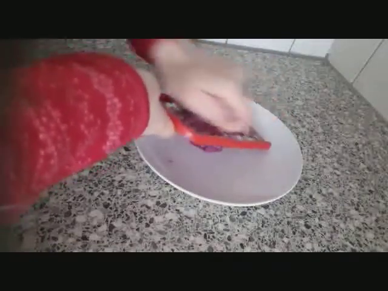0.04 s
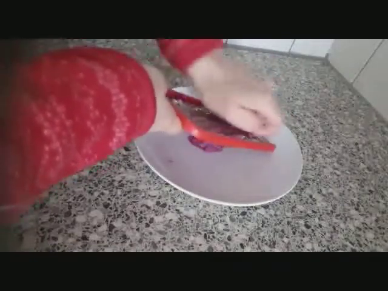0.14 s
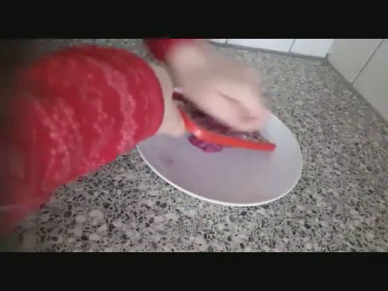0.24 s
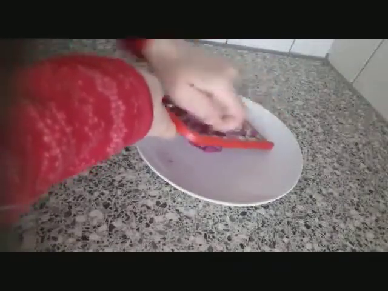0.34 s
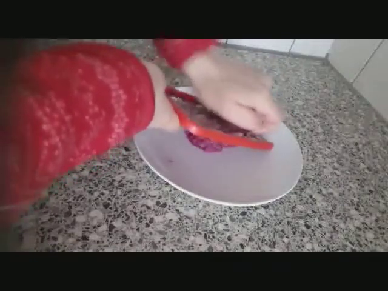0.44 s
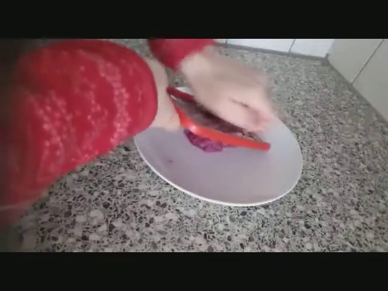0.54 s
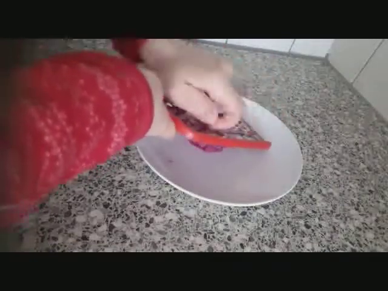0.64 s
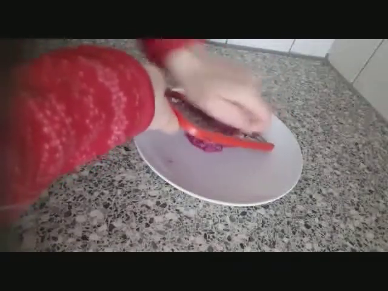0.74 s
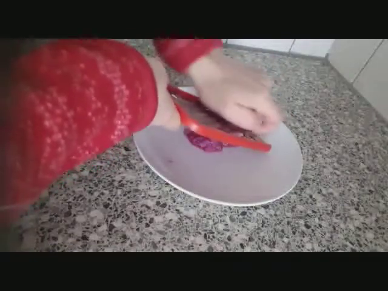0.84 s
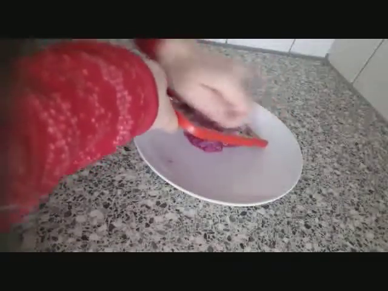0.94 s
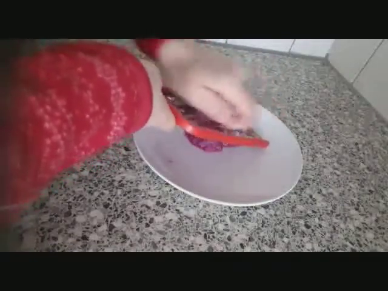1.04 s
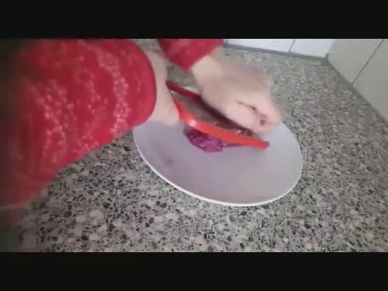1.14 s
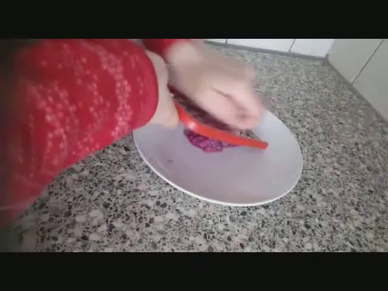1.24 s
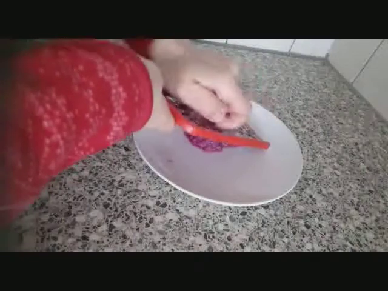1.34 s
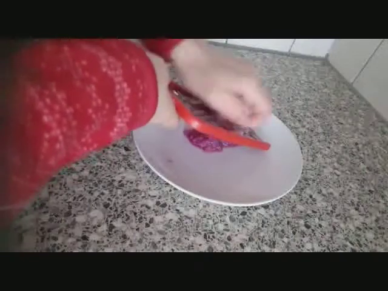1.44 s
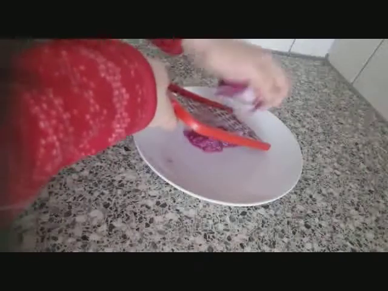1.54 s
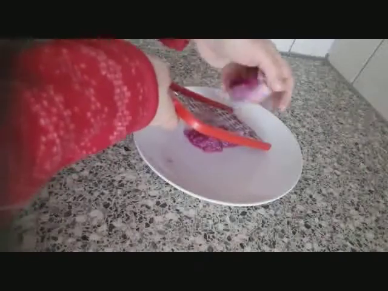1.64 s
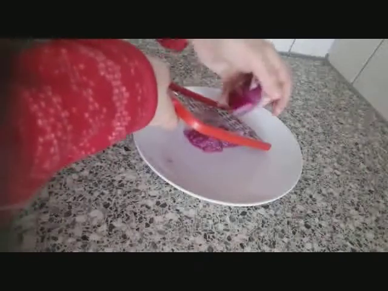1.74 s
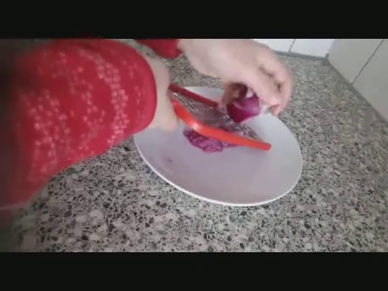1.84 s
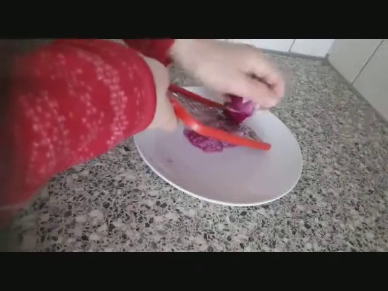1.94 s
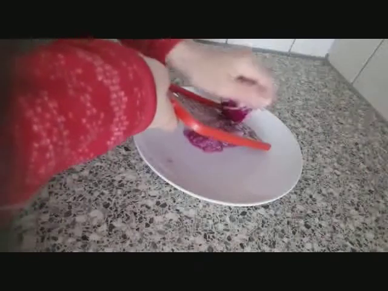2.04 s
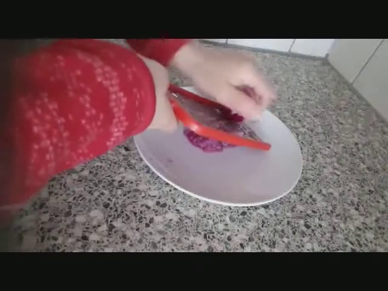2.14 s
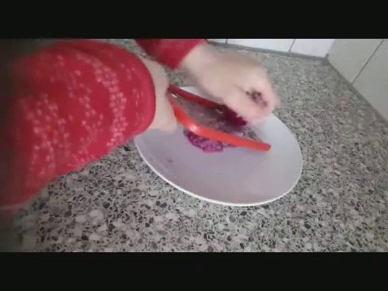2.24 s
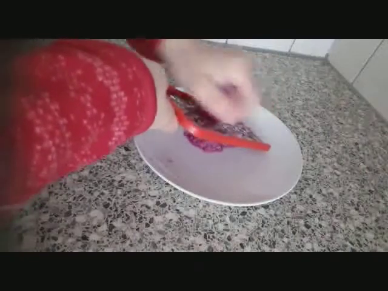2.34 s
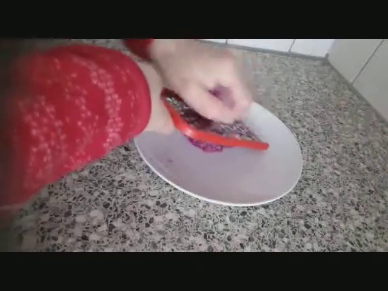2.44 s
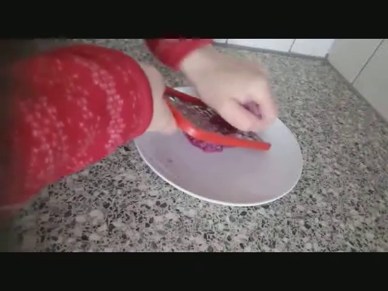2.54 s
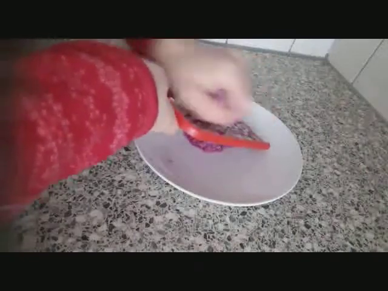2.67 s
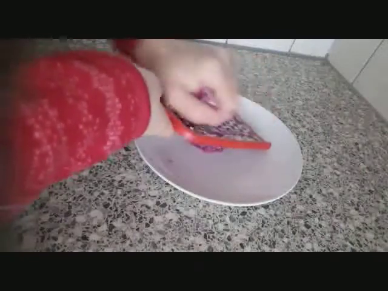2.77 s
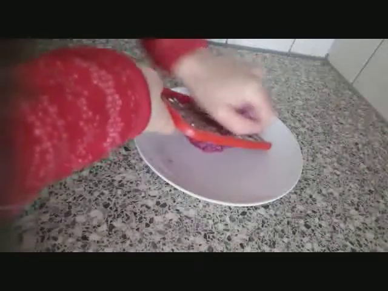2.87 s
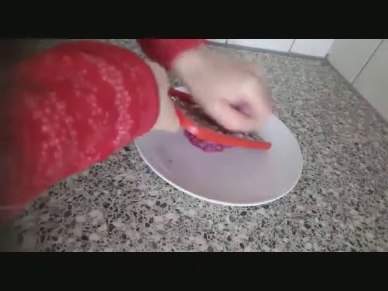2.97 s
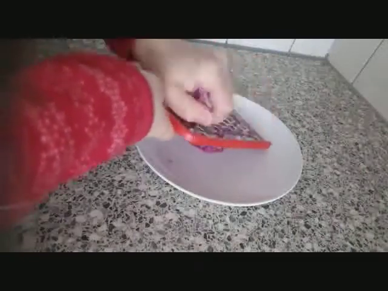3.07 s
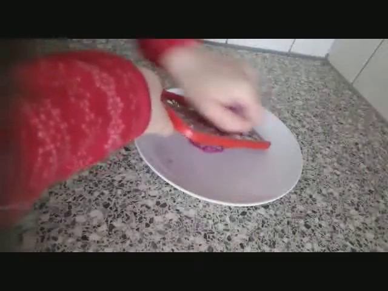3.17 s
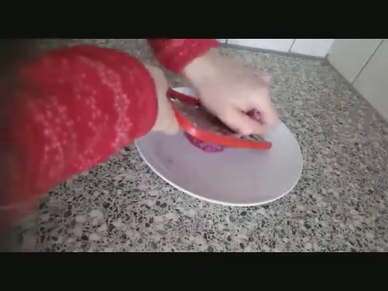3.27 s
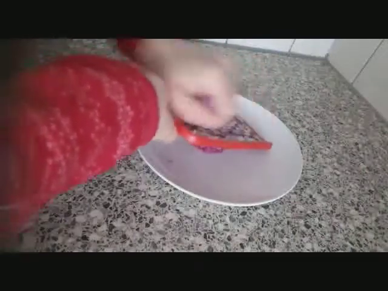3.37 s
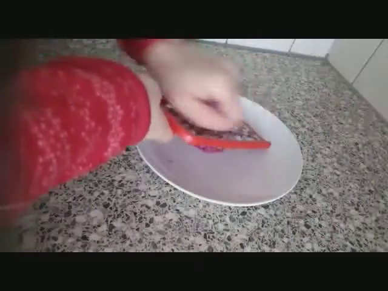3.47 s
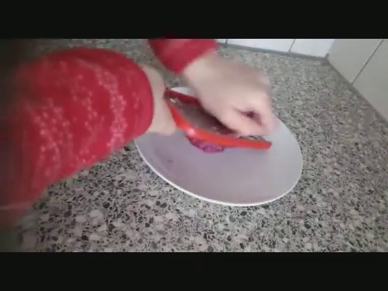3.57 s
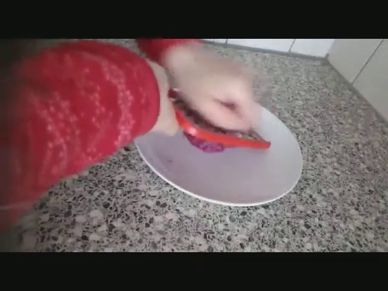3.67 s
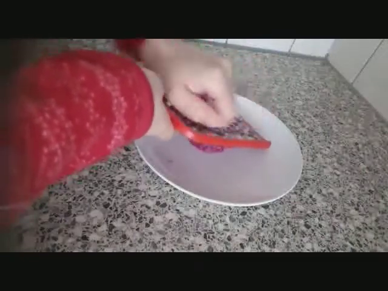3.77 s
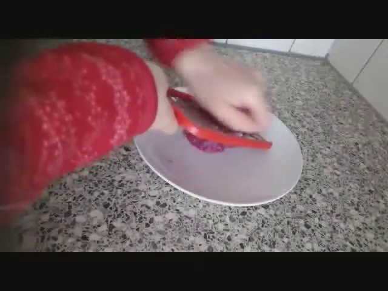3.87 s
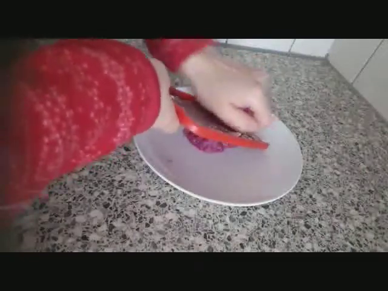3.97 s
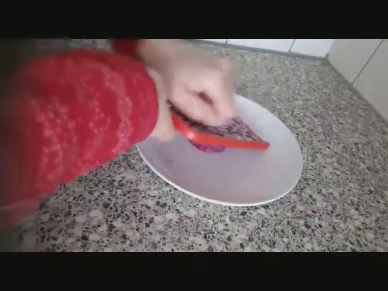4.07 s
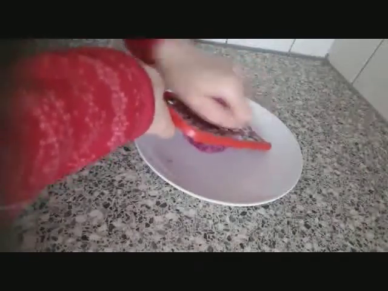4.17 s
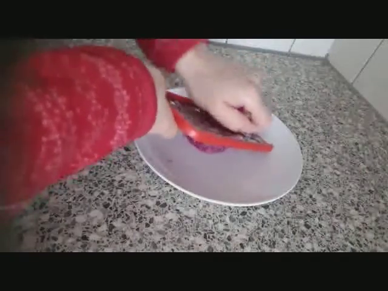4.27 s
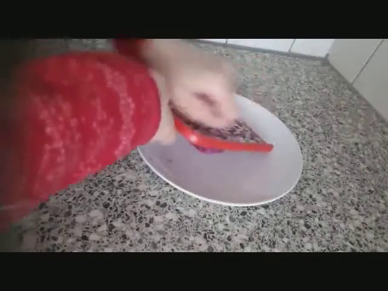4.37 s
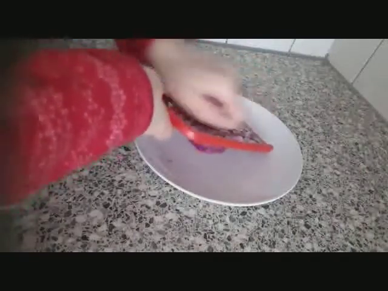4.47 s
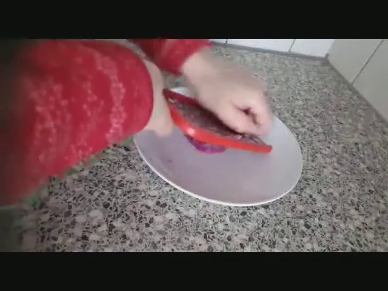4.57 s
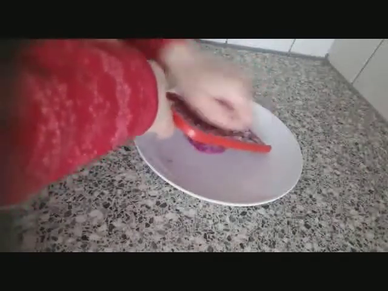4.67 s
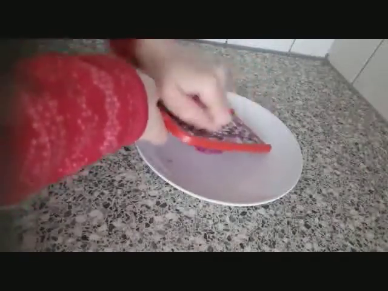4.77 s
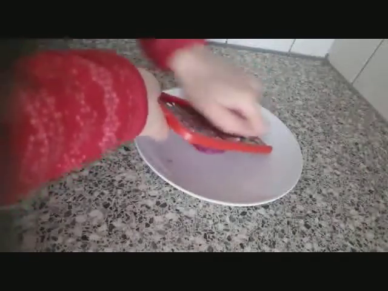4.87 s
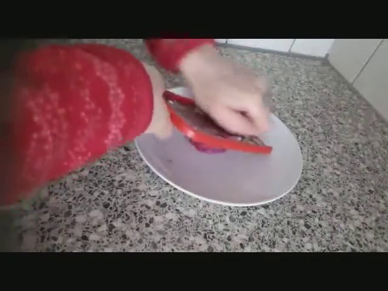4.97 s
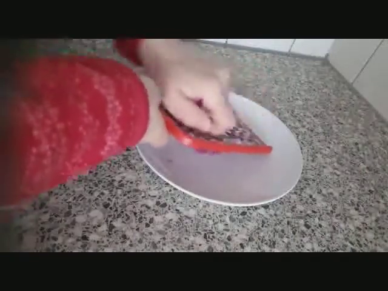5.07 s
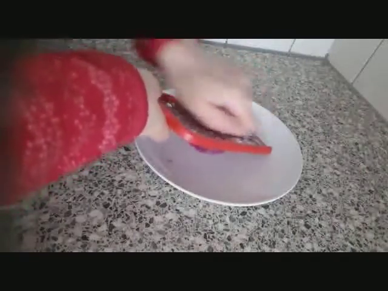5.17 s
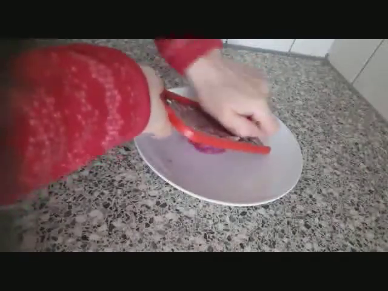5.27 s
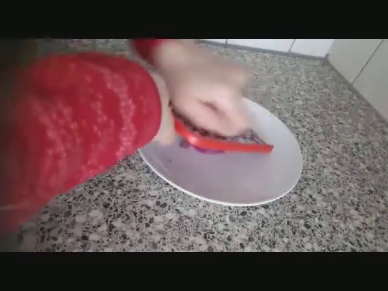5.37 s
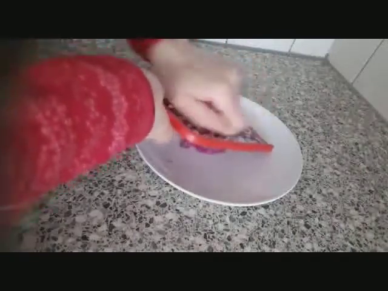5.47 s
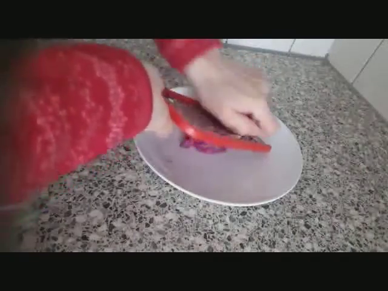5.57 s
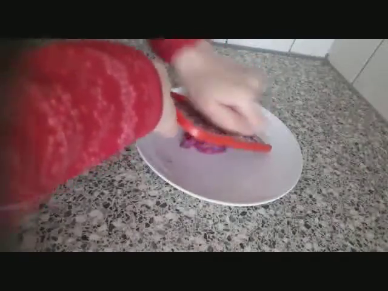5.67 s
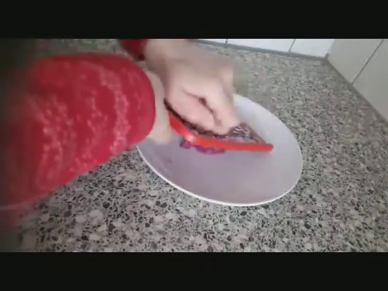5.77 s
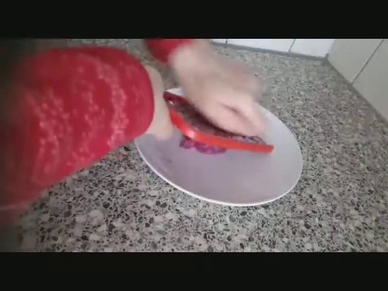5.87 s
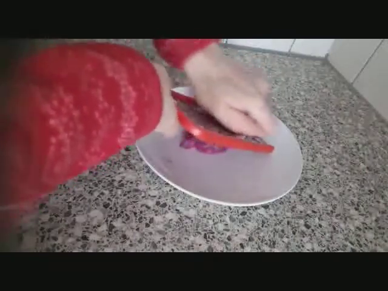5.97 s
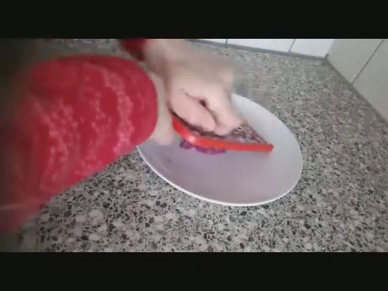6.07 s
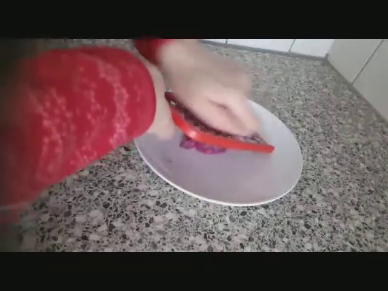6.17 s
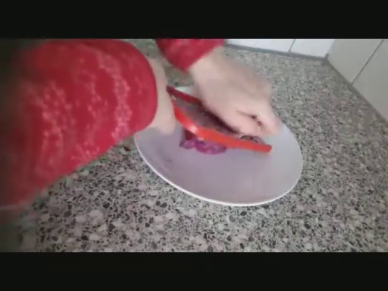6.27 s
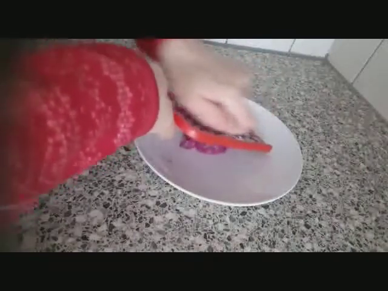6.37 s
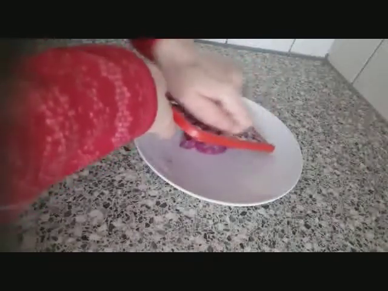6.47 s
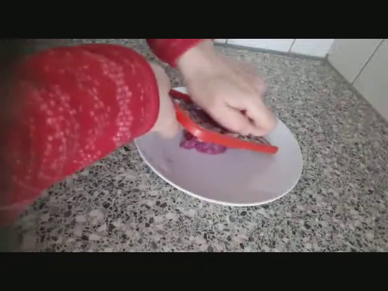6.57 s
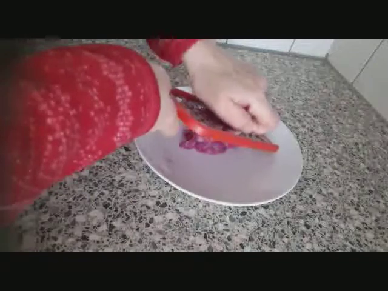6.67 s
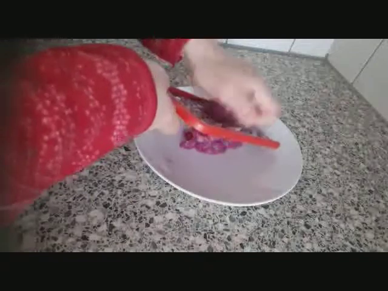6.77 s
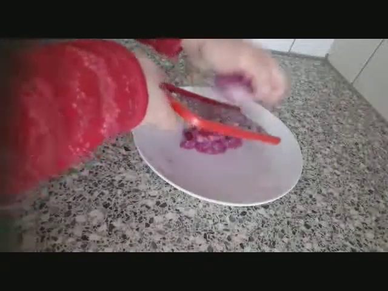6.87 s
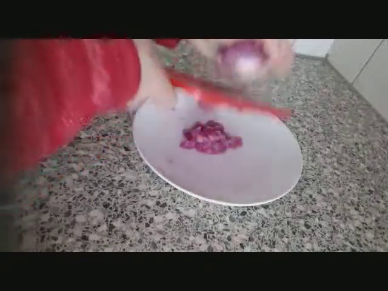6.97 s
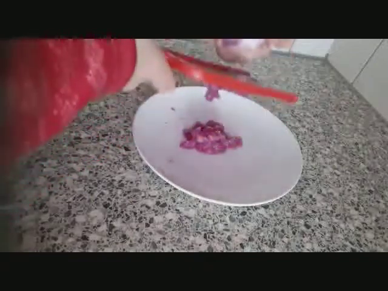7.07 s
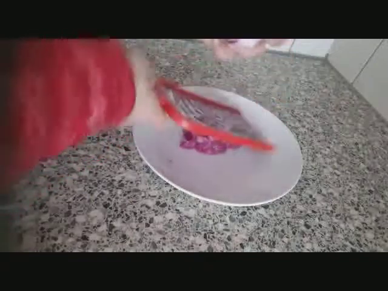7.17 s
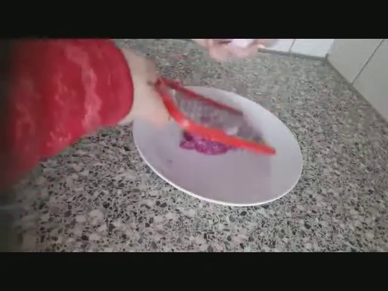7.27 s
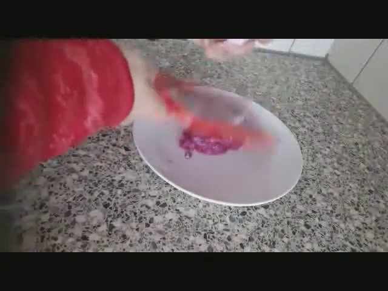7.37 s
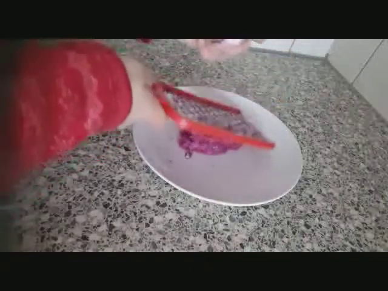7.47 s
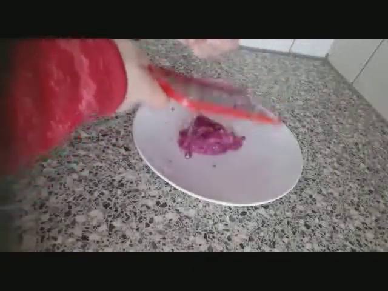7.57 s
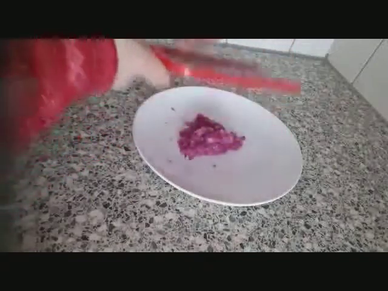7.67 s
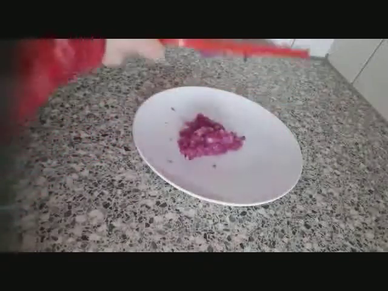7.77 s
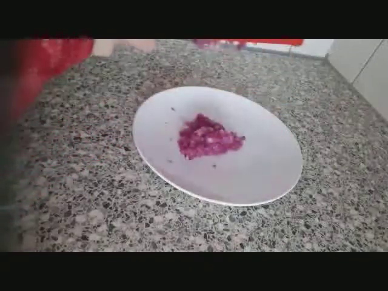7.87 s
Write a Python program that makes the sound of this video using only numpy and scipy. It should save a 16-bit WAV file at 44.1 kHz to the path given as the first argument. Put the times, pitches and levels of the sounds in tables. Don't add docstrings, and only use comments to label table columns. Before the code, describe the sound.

Fast to-and-fro wet rasping of an onion on a metal grater, a brief pause, more strokes, then two sharp knocks on a ceramic plate.

```python
import sys
import numpy as np
from scipy import signal
from scipy.fft import rfft, irfft, next_fast_len
from scipy.io import wavfile
from scipy.ndimage import uniform_filter1d

SR = 44100
rng = np.random.default_rng(int(sys.argv[2]) if len(sys.argv) > 2 else 0)


def waveform_to_disk(signal):
    frames = np.transpose(np.atleast_2d(signal))
    scaled = np.clip(frames, -1, 1) * 32767
    samples = np.round(scaled).astype(np.int16)
    wavfile.write(sys.argv[1], SR, samples)


def natural_amplitude(level_db):
    exponent = np.asarray(level_db, float) / 20
    return 10 ** exponent


N = 348831
SIZE = next_fast_len(N + SR // 2, True)
HZ = np.maximum(np.arange(SIZE // 2 + 1) * SR / SIZE, 1)
SECONDS = np.arange(N) / SR
TURNED_S = 1.9
COUNTER_HZ, COUNTER_WIDTH_HZ = 103.3, 11


def rms_one(x):
    return x / np.sqrt(np.mean(x ** 2) + 1e-20)


def at_hz(points):
    hz, value = np.transpose(points)
    return np.interp(np.log(HZ), np.log(hz), value)


def coloured(x, points):
    cepstrum = irfft(at_hz(points) * np.log(10) / 20, SIZE)
    cepstrum[1:SIZE // 2] *= 2
    cepstrum[SIZE // 2 + 1:] = 0
    response = np.exp(rfft(cepstrum))
    response = response / np.sqrt(np.mean(abs(response) ** 2))
    return irfft(rfft(x, SIZE) * response, SIZE)[..., :N]


def drift(rate_hz):
    r = np.exp(-40 * np.pi * rate_hz / SR)
    slow = signal.lfilter([1], [1, -2 * r, r * r], rng.standard_normal(N // 20 + 2002))[2000:]
    return np.interp(np.arange(N) / 20, np.arange(len(slow)), rms_one(slow))


def resonance(x, hz, width_hz):
    r = np.exp(-np.pi * width_hz / SR)
    poles = [1, -2 * r * np.cos(2 * np.pi * hz / SR), r * r]
    return signal.lfilter([(1 - r * r) / 2, 0, (r * r - 1) / 2], poles, x)


def evened(x, over_s):
    return x / np.sqrt(uniform_filter1d(x ** 2, int(over_s * SR), axis=-1) + 1e-12)


def grains(per_s, spread_db):
    unevenness = np.minimum(rng.exponential(1, (2, N)), 5)
    sizes = natural_amplitude(spread_db * unevenness) * rng.standard_normal((2, N))
    return sizes * (rng.random((2, N)) < per_s / SR)


def puffs(times, level_db, length_s):
    shape = np.zeros(N)
    for s, db, length in zip(times, level_db, length_s):
        tail = shape[round(s * SR):][:SR // 2]
        tail += natural_amplitude(db) * np.exp(-np.minimum(np.arange(len(tail)) / SR / length, 40))
    return shape * rng.standard_normal((2, N))


# frequency in Hz, left-right correlation.
LIKENESS = [(60, .995), (130, .99), (290, .9), (640, .6), (1400, .25), (3100, .05), (6800, -.1),
            (15000, 0.02)]
# frequency in Hz, left minus right in dB.
TILT = [(60, 0), (150, -3), (300, -1.6), (1000, -0.2), (5000, -1.5), (9000, 2.5), (14000, -5.5)]


def to_pair(mid, side):
    left_lead_s = 8e-5
    alike = np.clip(at_hz(LIKENESS), -1, 1)
    sign = np.array([[1], [-1]])
    shared = np.sqrt(.5 + .5 * alike) * rfft(mid, SIZE)
    apart = np.sqrt(.5 - .5 * alike) * rfft(side, SIZE)
    both = shared + sign * apart
    both = both * natural_amplitude(sign * at_hz(TILT) / 2) * np.exp(1j * np.pi * sign * HZ * left_lead_s)
    return irfft(both, SIZE)[:, :N]


# frequency in Hz, level in dB per Hz.
HUSH = [(30, -29), (112, 4.5), (176, -16), (245, -4.5), (400, -21.5), (1150, -30.5), (1950, -17.5),
        (2900, -36), (3900, -30), (4900, -18.5), (6000, -26), (7100, -20), (8300, -46.5), (14000, -27.5)]
# time in seconds, level in dB.
HUSH_LEVEL = [(0, -60), (1.601, -56), (2.2, -54.5), (6.9, -52.5), (7.1, -56), (7.91, -62)]


def hush():
    level_db = np.interp(SECONDS, *np.transpose(HUSH_LEVEL))
    return natural_amplitude(level_db + 0.78 * drift(4)) * coloured(rng.standard_normal((2, N)), HUSH)


# frequency in Hz, t60 in seconds.
KITCHEN = [(100, 0.069), (400, 0.22), (1000, 0.22), (5000, 0.3), (14000, .2)]


def kitchen(x):
    out = []
    loss = -3 * np.log(10) / at_hz(KITCHEN) - 2j * np.pi * HZ
    for side in x:
        loops = [np.exp(loss * d) for d in rng.uniform(.007, .03, 10)]
        echoes = sum(g / (1 - g) * (-1) ** k for k, g in enumerate(loops))
        out.append(irfft(rfft(side, SIZE) * echoes, SIZE)[:N])
    return np.array(out)


# start in seconds, end in seconds, level in dB.
MOANS = [
    (6.875, 6.995, -56.5),
    (7.68, 7.86, -70),
]


def moans():
    moan_hz = 790
    shape = 0
    for start, end, db in MOANS:
        times = [start, start + 0.01, end, end + 0.066]
        shape = shape + natural_amplitude(db) * np.interp(SECONDS, times, [0, 0.89, 0.43, 0])
    tone = resonance(resonance(rng.standard_normal((2, N)), moan_hz, 25.0), moan_hz, 60.0)
    return shape * evened(tone, 0.033)


# start in seconds, peak in dB, fizz above it in dB, length in seconds.
TICKS = [(1.657, -45, -21, 0.0068), (1.707, -41, -20, 0.0061), (1.906, -36, -22, 0.005),
         (1.9794, -44, -16, 0.0059), (2.006, -34.5, -19, 0.0085), (2.0294, -44, -12, 0.005),
         (2.166, -53, -10, 0.005), (2.19, -59, 1, 0.0043), (2.231, -28, -11, 0.005),
         (2.328, -28, -7, 0.0047), (4.5645, -7, -24, 0.005), (4.599, -19, -23, 0.0031),
         (5.385, -11, -11, 0.003)]


def ticks():
    s, peak_db, fizz_db, length_s = np.transpose(TICKS)
    length_s = np.clip(length_s, .001, .03)
    flesh = coloured(puffs(s, peak_db - 12.5, length_s), TEAR)
    return flesh + coloured(puffs(s, peak_db + fizz_db - 0.5, length_s), FIZZ)


# start in seconds, ring in dB, crack in dB, thud in dB, contact corner in Hz.
KNOCKS = [
    (6.868, -44, -37, -50, 1300),
    (7.2300, -26.5, -3.5, -25.5, 12000),
    (7.2365, -25, 1, -37.5, 12000),
    (7.4608, -23.5, -3, -21, 12000),
    (7.4642, -48, -7.5, -36, 7000),
    (7.47, -36, -10, -35, 7000),
]
# frequency in Hz, level in dB per Hz.
CRACK = [(120, -36), (200, -10), (1520, -24), (1970, -8), (2250, -16.5), (4530, -6), (5760, -13.5),
         (6200, -2.5), (8650, -47), (15600, -26), (16500, -58)]
# frequency in Hz, level in dB per Hz.
CLATTER = [(88, -48), (150, -11), (311, -12), (709, -13), (783, -11), (1470, -20.5), (2550, -18.5),
           (3930, -18), (4420, -9.5), (6420, -21), (8970, -39.5), (13300, -38), (16500, -64)]
# frequency in Hz, level in dB, t60 in seconds.
PLATE = [(318, 1, .2), (400, -5, .18), (520, -14, .2), (780, -13, .2), (964, -18, .24), (1335, -16, .26),
         (1647, -13, .2), (1990, -9, .12), (2622, -6, .24), (2875, -6, .16), (3320, -13, .22),
         (3710, -10, .28), (4300, -8, .22), (4420, -3, .24), (4555, -6, .22), (4970, -9, .15),
         (6240, -4, .23), (7290, -21, .2), (8355, -32, .22)]


def knocks():
    clatter_db, clatter_decay_s = -26.5, 0.044
    s, ring_db, crack_db, thud_db, corner_hz = np.transpose(KNOCKS)
    at = np.round(s * SR).astype(int)
    start = at[0] - 10
    out = coloured(puffs(s, crack_db, np.full(len(s), .002)), CRACK)
    out += coloured(puffs(s, crack_db + clatter_db, np.full(len(s), clatter_decay_s)), CLATTER)
    spread = np.array([-.012, -.0035, .0015, .008])
    modes = [(hz * (1 + apart), ring_db + db, t60) for hz, db, t60 in PLATE for apart in spread]
    modes += [(COUNTER_HZ, thud_db, .22), (170, thud_db - 2.5, .16), (235, thud_db - 19, .2)]
    for hz, db, t60 in modes:
        clicks = np.zeros((2, N - start))
        soft = 1 / (1 + (hz / corner_hz) ** 2)
        strength = natural_amplitude(db + 1.8 * rng.standard_normal((len(s), 2)).T)
        clicks[:, at - start] = soft * strength * rng.choice([-1, 1], (2, 1))
        r, w = natural_amplitude(-60 / (t60 * SR)), 2 * np.pi * hz / SR
        poles = [1, -2 * r * np.cos(w), r * r]
        out[:, start:] += signal.lfilter([0, np.sin(w)], poles, clicks + 1e-18)
    return signal.sosfilt(signal.butter(3, 70, "high", fs=SR, output="sos"), out)


# start in seconds, tearing in dB,
# frame judder in dB, counter hum in dB, share of the stroke at which the hand leans hardest.
PUSHES = [(0.058, -29.5, -37, -34.5, 0.57), (0.394, -28.5, -31.5, -38.5, 0.59),
          (0.737, -28.5, -34.7, -40.5, 0.48), (1.069, -29.5, -33.5, -31.6, 0.65),
          (1.393, -39, -47.5, -46, 0.48), (2.483, -28, -32.3, -34.5, 0.6), (2.821, -26, -27, -23.5, 0.7),
          (3.149, -25.5, -28, -26, 0.67), (3.494, -27.0, -30.5, -30, 0.57),
          (3.837, -27.0, -29.5, -26.0, 0.59), (4.177, -29.5, -36, -30.6, 0.7),
          (4.492, -28.5, -29.5, -28.5, 0.76), (4.824, -29, -33, -35, 0.65), (5.172, -27, -33, -33.5, 0.85),
          (5.504, -28.2, -33, -32, 0.68), (5.845, -30.5, -32, -30, 0.66), (6.157, -29.5, -34.5, -35, 0.7),
          (6.503, -33, -38, -36, 0.8)]
# start in seconds, tearing, judder and hum in dB, share of hardest lean.
PULLS = [(-0.098, -29, -32.5, -37.5, 0.79), (0.259, -29, -30.5, -35.5, 0.64),
         (0.576, -30.5, -32.3, -31.5, 0.54), (0.913, -30.5, -32, -35, 0.65), (1.235, -30, -30.0, -38, 0.67),
         (2.295, -31, -33, -32, 0.59), (2.643, -28, -34.5, -30.3, 0.77), (2.989, -29.5, -34.0, -30, 0.72),
         (3.328, -29, -33.5, -33, 0.62), (3.679, -30, -32, -32.5, 0.48), (4.011, -31, -34.5, -36, 0.55),
         (4.339, -33.2, -36, -32.5, 0.7), (4.661, -31.5, -35.5, -36.5, 0.88),
         (5.015, -30, -34.5, -30.7, 0.62), (5.334, -28, -31.5, -32, 0.52), (5.682, -28.5, -34, -32.9, 0.57),
         (6.017, -30, -33, -37, 0.74), (6.349, -30, -32, -29.5, 0.51)]
# start in seconds, length in seconds, tearing in dB, frame judder in dB, counter hum in dB.
TOUCHES = [
    (1.679, 0.08, -72, -78, -55),
    (1.798, 0.23, -69, -62.5, -52),
    (2.038, 0.14, -75, -77, -62),
    (2.221, 0.039, -57, -37.5, -30),
    (2.226, .09, -62, -47, -33),
    (2.243, .04, -40, -48, -38),
    (6.66, 0.093, -58, -56, -61),
    (6.744, 0.034, -49.5, -62, -62),
    (6.78, 0.058, -52, -61, -65),
    (6.82, 0.19, -70, -60, -58),
]
USUAL_LEAN = .65


def hand():
    last_stroke_s, trail_off = .135, 1.5
    bite_in = 2.8
    rows = np.array(sorted([(*row, 1) for row in PUSHES] + [(*row, 0) for row in PULLS]))
    length = np.diff(rows[:, 0], append=99)
    last = length > 2 * last_stroke_s
    first = np.r_[False, last[:-1]]
    touch = np.array(TOUCHES)
    flat = np.ones(len(touch))
    return (np.r_[rows[:, 0], touch[:, 0]],
            np.r_[np.where(last, last_stroke_s, length), touch[:, 1]],
            np.r_[rows[:, 5], 0 * flat],
            np.r_[rows[:, 4], USUAL_LEAN * flat],
            np.r_[np.where(last, trail_off, 1), flat],
            np.r_[np.where(first, bite_in, 1), flat],
            np.r_[rows[:, 1:4], touch[:, 2:]].T)


TEAR_SWELL = (.595, .583, .278, .449, .306, 2.13)
JUDDER_SWELL = (0.58, 0.51, 0.21, 0.29, 0.36, 1.88)
HUM_SWELL = (0.71, 0.74, 1.3, 0.36, 0.3, 1.52)


def swells(start, length, push, lean, slow, abrupt, level_db, swell):
    at_push, at_pull, follow, rise, fall, squareness = swell
    t = np.arange(0, N + 64, 64) / SR
    peak = np.where(push, at_push, at_pull) + follow * (lean - USUAL_LEAN)
    past = (t[:, None] - start) / length - peak
    width = np.where(past < 0, rise, fall * slow)
    power_law = squareness * np.where(past < 0, abrupt, 1)
    shape = np.exp(-2 * abs(past / width) ** power_law)
    power = shape @ natural_amplitude(2 * level_db) + 1e-9
    return np.interp(SECONDS, t, 10 * np.log10(power))


def wetness(start, length, push):
    push_db, pull_db, fresh_db, sag_db = -13, -11.5, 1.5, 4.5
    order = np.argsort(start)
    db = np.where(push, push_db, pull_db) + fresh_db * (start > TURNED_S)
    s = np.c_[start, start + .95 * length][order].ravel()
    ends_db = (db[order, None] + [sag_db / 2, -sag_db / 2]).ravel()
    return np.interp(SECONDS, np.maximum.accumulate(s), ends_db)


def tooth_rows(speed, jitter):
    rows_per_s = 105
    return np.cumsum(rows_per_s * speed * natural_amplitude(jitter * drift(25))) / SR


# frequency in Hz, width in Hz, level in dB.
FRAME = [(168.5, 106, 0.5), (218.5, 40, 5.5), (241.3, 27.2, 3), (323.3, 31, 3), (395, 50, 0),
         (539.6, 12, 0.5), (597, 44, -7.5)]


def jolts(turns, judder_db, hum_db):
    push = np.diff(np.floor(turns), prepend=0) * natural_amplitude(4.6 * rng.standard_normal((2, N)))
    push = rms_one(push) + natural_amplitude(-1.0) * rms_one(grains(500, 2.06))
    judder = 0
    for k, (hz, width_hz, db) in enumerate(FRAME):
        judder = judder + natural_amplitude(db) * resonance(push, hz, width_hz) * (-1) ** k
    hum = resonance(resonance(push, COUNTER_HZ, COUNTER_WIDTH_HZ), COUNTER_HZ, 70.0)
    low = natural_amplitude(judder_db) * evened(judder, 0.13) + natural_amplitude(hum_db) * evened(hum, 0.023)
    return signal.sosfilt(signal.butter(2, 45, "high", fs=SR, output="sos"), low)


# frequency in Hz, level in dB per Hz.
TEAR = [(350, -53), (600, -24.5), (889, -20.5), (1200, -22), (1330, -12.5), (1760, -20), (2070, -13),
        (3600, -10.5), (4180, -11), (5910, -8), (7630, -15.5), (8460, -38), (9500, -54), (12400, -21),
        (20900, -120)]
# frequency in Hz, level in dB per Hz.
FIZZ = [(5290, -60), (9000, -2.5), (15100, 10.5), (16200, -12), (16400, -48), (16500, -48.5)]
# frequency in Hz, level in dB.
SHEET = [(1310, -1), (2040, -25), (2600, -9.5), (3300, -5), (3650, 0), (4480, 2.5), (4900, -15), (5700, 3),
         (6250, 3.5)]


def tearing(turns, tear_db, fizz_db):
    contrast, gain_db = 0.24, 3.5
    bunch = natural_amplitude(.8 * np.cos(2 * np.pi * turns) + 1.1 * drift(45) + .8 * drift(300))
    bursts = evened(bunch * grains(12000, 0.81), 0.029)
    spectrum = rfft(coloured(bursts, TEAR), SIZE)
    first_face_db = 4.5 * (SECONDS < TURNED_S)
    step = np.log2(HZ / 500) * 3
    tear = 0
    for k in range(14):
        band = np.clip(1 - abs(np.clip(step, 0, 13) - k), 0, 1)
        focus_db = -.02 * abs(k - 9) * (tear_db + 39.0)
        band_db = 1.67 * drift(13.4) + focus_db + first_face_db * (k < 6)
        tear = tear + natural_amplitude(band_db) * irfft(spectrum * band, SIZE)[:, :N]
    sung = sum(natural_amplitude(db + 5.5 * drift(8)) * resonance(bursts, hz, 170.0) for hz, db in SHEET)
    tear = evened(tear + natural_amplitude(-10.5) * rms_one(sung), 0.056)
    fizz = natural_amplitude(fizz_db) * coloured(evened(bunch * grains(16000, 1.8), 0.052), FIZZ)
    return natural_amplitude(tear_db + contrast * (tear_db + 28) + gain_db) * (tear + fizz)


def scene():
    *contact, levels = hand()
    tear_db = swells(*contact, levels[0], TEAR_SWELL)
    judder_db = swells(*contact, levels[1], JUDDER_SWELL)
    hum_db = swells(*contact, levels[2], HUM_SWELL)
    speed = np.clip(natural_amplitude(.5 * (tear_db + 30)), .4, 1.3)
    turns = tooth_rows(speed, jitter=2.5)
    grated = tearing(turns, tear_db, wetness(*contact[:3])) + jolts(turns, judder_db, hum_db)
    rubbed = grated + ticks() + moans()
    struck = knocks()
    echoes = kitchen(natural_amplitude(-29.5) * rubbed + natural_amplitude(-20.0) * struck)
    return to_pair(*(rubbed + struck + echoes + hush()))


def top_cut(x):
    return signal.sosfilt(signal.butter(12, 17090, fs=SR, output="sos"), x)


def record(dry):
    rounded = .97 * np.tanh(dry / .97)
    lowpass = signal.cheby2(10, 60, 17400, fs=SR, output="sos")
    mix = signal.sosfilt(lowpass, rounded)
    return top_cut(mix)


dry = scene()
out = record(dry)
waveform_to_disk(out)
```